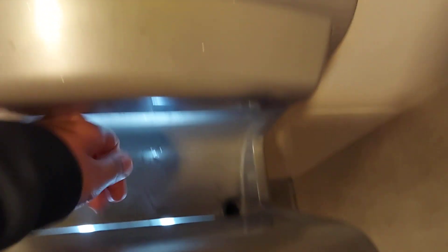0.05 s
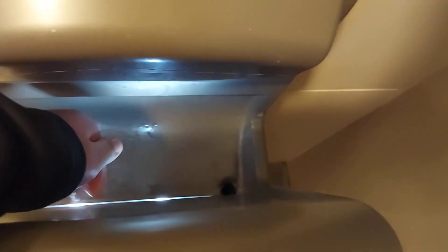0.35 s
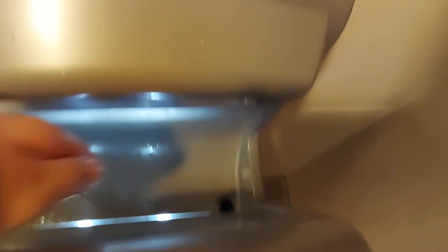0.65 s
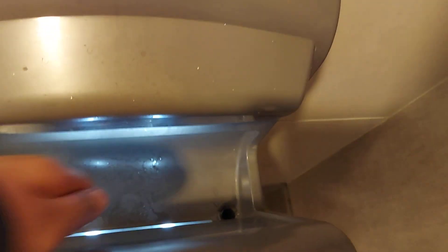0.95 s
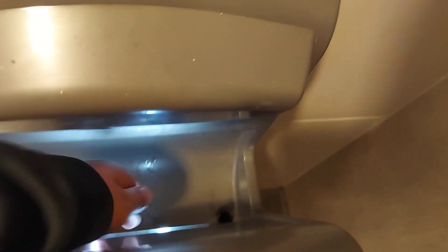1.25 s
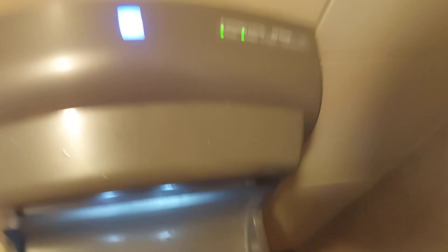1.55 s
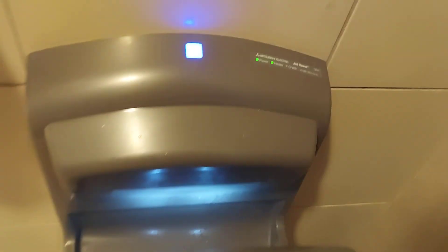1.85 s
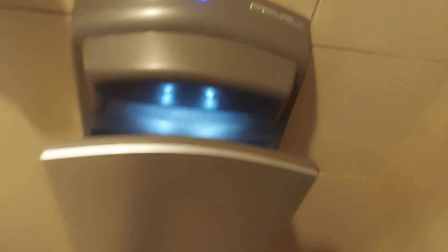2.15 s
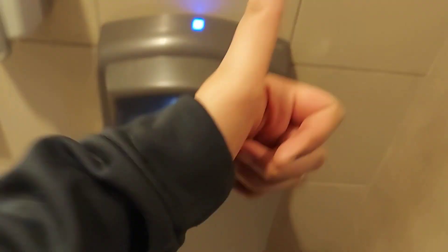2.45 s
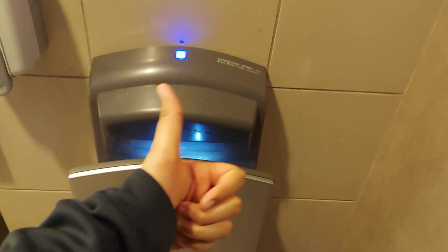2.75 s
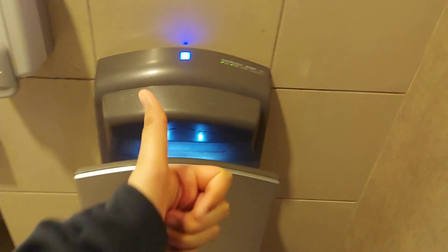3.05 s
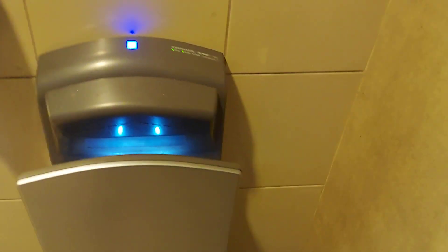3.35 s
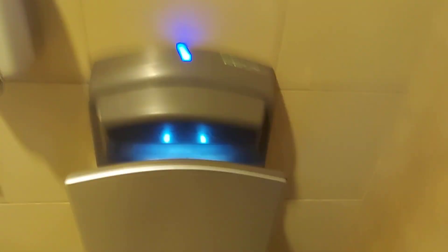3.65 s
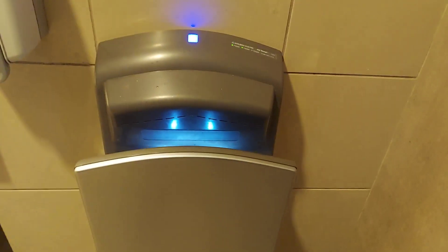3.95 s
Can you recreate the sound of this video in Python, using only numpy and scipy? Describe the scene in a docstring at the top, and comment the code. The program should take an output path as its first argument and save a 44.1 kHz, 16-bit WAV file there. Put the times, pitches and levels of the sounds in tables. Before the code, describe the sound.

A jet hand dryer blasts air over a hand, then starts winding down.

```python
"""A tiled restroom, the stereo microphone close to the trough of a running jet hand dryer. Air hisses
from the slits and booms in the trough, splashing and howling where a hand dips into the jets. The hand
leaves and the microphone backs away, so that the duct's drone and the fan's whine stand out.
Near the end the motor cuts out and the whine falls as the fan coasts down."""
import sys
import numpy as np
from scipy import signal
from scipy.fft import rfft, irfft, next_fast_len
from scipy.io import wavfile
from scipy.ndimage import map_coordinates

SR = 44100
rng = np.random.default_rng(int(sys.argv[2]) if len(sys.argv) > 2 else 0)


def int16_out(signal):
    """Quantize to a 16-bit WAV file."""
    q = np.round(np.clip(np.atleast_2d(signal).T, -1, 1) * 32767)
    wavfile.write(sys.argv[1], SR, q.astype(np.int16))


N = 176400


def amp(db):
    """Decibels to gain."""
    return 10 ** (np.asarray(db) / 20)


def unit(x):
    """Scale to rms 1."""
    return x / np.sqrt(np.mean(np.abs(x) ** 2) + 1e-20)


def along(points, hz):
    """Read (freq_hz, value) points on a log axis."""
    freqs, values = np.transpose(points)
    return np.interp(np.log(hz + 1), np.log(freqs + 1), values)


def clock():
    """The time of each sample."""
    return np.arange(N) / SR


def curve(rows):
    """(time_s, value) points joined by lines."""
    return np.interp(clock(), *np.transpose(rows))


def wobble(rate):
    """A smooth random curve, rate knots a second."""
    at = np.linspace(0, rate * N / SR, 4096)
    return np.interp(clock() * rate, at, map_coordinates(rng.standard_normal(2048), [at], mode="wrap"))


def scatter(rate):
    """The random strength and phase with which a tone reaches each channel through the room."""
    return unit(np.array([wobble(rate) + 1j * wobble(rate) for channel in range(2)]))


def peak(hz, pitch_hz, half_width_hz):
    """The gain of one resonance."""
    return 1 / np.hypot(1, (hz - pitch_hz) / half_width_hz)


def rush(gain, likeness, size=N):
    """Stereo noise of rms 1, coloured by gain(hz)."""
    hz = np.fft.rfftfreq(size, 1 / SR)
    angle = np.arccos(np.clip(along(likeness, hz), -1, 1)) / 2
    spectrum = rfft(rng.standard_normal((2, size))) * gain(hz)
    mid, side = irfft(spectrum * [np.cos(angle), np.sin(angle)], size)
    return unit(np.array([mid + side, mid - side]))


def swells(rows, likeness):
    """Bands of noise that each rise and fall once, within a second."""
    out, t = np.zeros((2, N + SR)), np.arange(SR) / SR - .5
    for peak_s, half_length_s, pitch_hz, half_width_hz, level_db in rows:
        band = rush(lambda hz: peak(hz, pitch_hz, half_width_hz), likeness, size=SR)
        start = max(round(peak_s * SR), 0)
        out[:, start:start + SR] += amp(level_db) * np.exp(-(t / half_length_s) ** 2 / 2) * band
    return out[:, SR // 2:][:, :N]


# Stereo image out in the room: freq_hz, left_right_likeness
ROOM_IMAGE = [(30, 0.89), (90, 1), (200, 0.96), (420, .92), (700, 0.37), (930, 0.52), (1130, 0.61),
              (1300, 0.48), (1520, 0.16), (1850, 0.28), (2100, 0.48), (2400, 0.46), (2850, 0.36),
              (4000, -0.44), (6000, -0.028), (15000, -0.0069)]
def flow(spectrum, level, gust_db, likeness=ROOM_IMAGE):
    """Coloured air noise on a relative level curve, with slow and quick turbulence."""
    gusts = gust_db * unit(wobble(8.94) + wobble(29.94))
    return amp(curve(level) + gusts) * rush(lambda hz: amp(along(spectrum, hz)), likeness)


def linger(x, t60_s=.35):
    """A sound rings on between the tiles."""
    tail = rush(np.ones_like, ROOM_IMAGE, size=SR) * amp(-60 * clock()[:SR] / t60_s)
    return signal.fftconvolve(x[None], unit(tail) / np.sqrt(SR), axes=1)[:, :N]


# Balance of the air noise at the microphone: freq_hz, left_over_right_db
BALANCE = [(70, 3.5), (140, -2), (300, 0), (700, 0.7), (1200, -1.2), (2200, -1.5), (4000, -1.3),
           (9000, -0.6)]
def tiles_and_eddies(x, treble_hz=1400):
    """Eddies stir the treble; reflections comb it, differently per channel, as the microphone moves."""
    hz, t, spectra = signal.stft(x, SR, nperseg=1024)

    def field(step_hz, rate):
        grid = np.meshgrid(hz / step_hz, t * rate, indexing="ij")
        return map_coordinates(rng.standard_normal((512, 256)), grid, mode="wrap")

    comb = 2.04 * np.array([field(step_hz=120.3, rate=1.29) for channel in range(2)])
    eddies = 1.34 * field(step_hz=1550, rate=45)
    ripple_db = (comb + eddies) * (hz / np.hypot(hz, treble_hz))[:, None]
    lean_db = along(BALANCE, hz) * np.array([[.5], [-.5]])
    return signal.istft(spectra * amp(ripple_db + lean_db[:, :, None]), SR, nperseg=1024)[1][:, :N]


# The duct, stronger from a step back
DUCT_SPECTRUM = [(150, -51), (220, -9), (250, -0.5), (270, 2.5), (295, -6), (312, -1.5), (328, -13.5),
                 (348, -0.5), (364, -8), (384, 2), (412, -12), (438, -8.5), (480, -20), (700, -28.5),
                 (1100, -61)]  # freq_hz, density_db
DUCT_LEVEL = [(0, -35), (.15, -27.5), (.48, -37), (.62, -30), (1.25, -29), (1.5, -31), (2.05, -29.5),
              (2.3, -26), (2.7, -25.5), (3.2, -24.5), (3.4, -24.5), (3.55, -28.5), (4, -30)]  # time_s, level_db
def duct_drone():
    """Air drones in the duct's low resonances."""
    return amp(-0.5) * flow(DUCT_SPECTRUM, DUCT_LEVEL, gust_db=1.0)


# The fan housing, heard near and far
HOUSING_SPECTRUM = [(400, -11), (620, -3.5), (800, -8), (960, -0.5), (1040, -2.5), (1140, 2), (1200, -5),
                    (1280, 6), (1420, -8), (1600, 4), (1750, -5), (1930, 4), (2200, -6), (2450, -7.5),
                    (2780, -3.5), (3100, -12), (4500, -33)]  # freq_hz, density_db
HOUSING_LEVEL = [(0, -30), (1.5, -33.5), (1.7, -36.5), (2.0, -31), (2.5, -34), (3.15, -30), (3.45, -32),
                 (3.75, -37), (4, -39.5)]  # time_s, level_db
def housing_air():
    """Air rushes through the fan housing, filling the midrange."""
    return flow(HOUSING_SPECTRUM, HOUSING_LEVEL, gust_db=1.0)


def motor_hum(rotor, speed, order=4):
    """The motor hums unsteadily at a multiple of the shaft rate and fades as it slows."""
    flutter = unit(1 + 1.06 * scatter(24.02)[0])
    return amp(-40 - 60 * (1 - speed)) * flutter * rotor ** order


# The casing, with the microphone in front of the dryer: time_s, level_db
CASING_LEVEL = [(1.75, -55), (1.9, -42), (2.35, -37), (2.55, -46), (2.9, -38), (3.2, -41), (3.4, -52),
                (3.55, -36), (3.7, -47), (3.85, -42.5), (4, -52)]
def casing_tone(speed, full_speed_hz=1140, sag_hz=90, width_hz=36):
    """A casing resonance whose pitch sags with the flow."""
    pitch_hz = full_speed_hz - sag_hz * (1 - speed)
    tone = np.exp(2j * np.pi * np.cumsum(pitch_hz) / SR)
    return amp(curve(CASING_LEVEL)) * scatter(2 * width_hz)[0] * tone


# The whine at the moving microphone: channels opposed beside the trough, alike from the front
WHINE_LEVEL = [(0, -42), (.18, -41), (.36, -30), (.55, -37), (.75, -36), (1.1, -44), (1.58, -42),
               (1.8, -29.5), (2.02, -32), (2.12, -41), (2.24, -34), (2.34, -44), (2.55, -41), (2.72, -32.5),
               (3.0, -49), (3.14, -37), (3.26, -44), (4, -75)]  # time_s, level_db
WHINE_PHASE = [(1.6, 2.7), (1.8, 1.5), (2.03, 1.9), (2.14, 0.2), (2.9, 0.2), (3.1, 2.2)]  # time_s, left_right_phase_rad
def blade_whine(rotor, shaft_hz, speed, blades=9, skirt_width_hz=45, skirt_below_hz=20):
    """The blade tone, wrapped in turbulent swish, sweeps through a housing resonance as it falls."""
    tone = rotor ** blades
    housing_gain = amp(-33) * peak(blades * shaft_hz, pitch_hz=1950, half_width_hz=95)
    ring = linger(np.real(tone * scatter(skirt_width_hz)[0]) * housing_gain)
    skirt = 0.8 * scatter(2 * skirt_width_hz)[0] * np.exp(-2j * np.pi * skirt_below_hz * clock())
    pan = amp([[-2.5], [2.5]])  # leans right
    phase = np.exp(1j * curve(WHINE_PHASE) * np.array([[.5], [-.5]]))
    whine = amp(curve(WHINE_LEVEL)) * unit(pan * phase * (1 + skirt))
    swish = amp(-43.5) * speed ** 2 * scatter(460)
    return ring + (whine + swish) * tone


def fan(running_hz=313.0, cut_s=3.17, half_speed_after_s=0.95):
    """Whine, casing tone and hum follow the shaft, which slows once the power is cut."""
    speed = 1 / (1 + np.maximum(clock() - cut_s, 0) / half_speed_after_s)
    shaft_hz = running_hz * speed * (1 + 0.00062 * wobble(8))
    rotor = np.exp(2j * np.pi * np.cumsum(shaft_hz) / SR)
    tones = blade_whine(rotor, shaft_hz, speed) + casing_tone(speed) + motor_hum(rotor, speed)
    return np.sqrt(2) * np.real(tones)


# Two narrow rings, strongest close in: time_s, level_db
EDGE_LEVEL = [(0, -40), (1.0, -36.5), (1.25, -42), (2.05, -45), (2.5, -49), (4, -72)]
CROSS_MODE_LEVEL = [(.5, -35), (.72, -28), (1.1, -33), (1.3, -39), (1.52, -27), (1.62, -34), (1.77, -27),
                    (1.95, -42), (3, -54)]
def whistles(edge_hz=5350, cross_hz=1900):
    """The jets ring the slit edges and a mode across the trough, opposed in the two channels."""
    edge = rush(lambda hz: peak(hz, edge_hz, half_width_hz=100), ROOM_IMAGE)
    cross_mode = rush(lambda hz: peak(hz, cross_hz, half_width_hz=200), likeness=[(cross_hz, -0.73)])
    return amp(curve(EDGE_LEVEL)) * edge + amp(curve(CROSS_MODE_LEVEL)) * cross_mode


# The trough's bass, fullest at close range
BOOM_SPECTRUM = [(20, -48), (40, -40), (68, -13.5), (88, -19), (110, -16), (126, -4.5), (143, 1.5),
                 (158, -11.5), (172, -1), (186, -15.5), (200, -6), (213, -23), (250, -17), (330, -52),
                 (600, -44)]  # freq_hz, density_db
BOOM_LEVEL = [(0, -21), (.2, -25.5), (.4, -28), (.62, -27), (.76, -20), (.88, -30), (1.0, -23.5),
              (1.15, -25.5), (1.35, -25.5), (1.55, -21), (1.75, -26), (1.95, -28), (2.3, -30),
              (3.15, -27.5), (3.5, -35)]  # time_s, level_db
def trough_boom():
    """The air stream booms in the hollow of the trough."""
    return amp(1.5) * flow(BOOM_SPECTRUM, BOOM_LEVEL, gust_db=-0.6)


# Low thumps from the trough: peak_s, half_length_s, pitch_hz, half_width_hz, level_db
BUFFETS = [(.91, .035, 112.4, 15, -24.5), (1.49, 0.048, 123, 14, -19.5), (3.37, 0.042, 116.4, 4.8, -33)]
def buffets():
    """Lumps of air buffet the trough."""
    return swells(BUFFETS, ROOM_IMAGE)


# The slits' broad hiss, and the sheen picked up in front of the dryer
HISS_SPECTRUM = [(1500, -27), (2600, -4.5), (3200, 1.5), (3700, 0), (4200, 1), (4600, 5.5), (4950, 1),
                 (5350, 3), (5800, 1), (6900, 1), (7600, 2), (8700, 2), (10200, -3.5), (11500, 0),
                 (13000, 0.5), (14200, -2.5), (16000, -4)]  # freq_hz, density_db
HISS_LEVEL = [(0, -33), (.38, -31.5), (.6, -32.5), (1.15, -33.5), (1.33, -33), (1.8, -33.5), (2.2, -36),
              (2.52, -39), (2.85, -38), (3.1, -36), (3.3, -38.5), (3.52, -41.5), (3.75, -47), (4, -52)]  # time_s, level_db
SHEEN_SPECTRUM = [(5500, -34), (7500, 1), (8600, -2), (9300, 1), (10300, -29)]  # freq_hz, density_db
SHEEN_LEVEL = [(0, -54), (2.5, -59), (3.1, -41), (3.5, -50), (4, -51)]  # time_s, level_db
def slit_hiss():
    """Air hisses from the slits, which beam their brightest sound to the front."""
    hiss = amp(5.5) * flow(HISS_SPECTRUM, HISS_LEVEL, gust_db=0.3)
    return hiss + flow(SHEEN_SPECTRUM, SHEEN_LEVEL, gust_db=1.5)


# The hand in the jets, with the microphone close to the trough
CLOSE_IMAGE = [(200, 0.56), (700, 0.84), (900, -0.6), (1200, 0.092), (1500, -0.16), (1700, 0.26),
               (2000, -0.36), (2400, 0.11), (2850, -0.97), (3600, 0.82), (4500, 0.43), (5400, 0.93),
               (7000, -0.088)]  # freq_hz, left_right_likeness
SPLASH_SPECTRUM = [(150, -12), (235, 16), (330, 6.5), (445, 13.5), (560, 7), (810, 3.5), (960, 3),
                   (1420, 5), (1680, 11), (2050, 6.5), (2400, 3.5), (2900, 4), (3400, -2.5), (5050, -4.5),
                   (7500, -10), (11000, -24), (16000, -11)]  # freq_hz, density_db
SPLASH_LEVEL = [(0, -27.5), (.4, -27), (.5, -27.5), (.78, -26.5), (1.15, -27), (1.5, -27), (1.64, -32),
                (2.0, -34.5), (2.4, -38.5), (3.2, -37.5), (4, -56)]  # time_s, level_db
HOWLS = [(.04, 0.14, 1850, 55, -27.5), (.37, 0.069, 4140, 1410, -26.5), (.38, 0.076, 1410, 300, -34),
         (0.567, .035, 4830, 700, -32.5), (.7, 0.1, 1760, 160, -25.5), (.88, 0.089, 2400, 280, -32.5),
         (.99, 0.068, 2060, 50, -30), (1.11, 0.076, 1865, 102, -23.5), (1.316, 0.078, 4790, 340, -30.5),
         (1.34, .05, 7200, 900, -33), (1.49, 0.06, 1690, 170, -25.5)]  # peak_s, half_length_s, pitch_hz, half_width_hz, level_db
def jets_on_hand():
    """The jets break on the hand and the trough wall; at each dip the gap howls or hisses."""
    splash = amp(3) * flow(SPLASH_SPECTRUM, SPLASH_LEVEL, gust_db=0.58, likeness=CLOSE_IMAGE)
    return splash + swells(HOWLS, CLOSE_IMAGE)


def scene():
    """Air, hand and fan in the tiled restroom."""
    air = slit_hiss() + trough_boom() + duct_drone() + housing_air() + buffets() + jets_on_hand()
    return tiles_and_eddies(air) + whistles() + fan()


def record(dry):
    """Nothing is kept above the band limit."""
    top_hz = 15750
    size = next_fast_len(N + SR // 2)
    passband = np.fft.rfftfreq(size, 1 / SR) < top_hz
    return irfft(rfft(dry, size) * passband, size)[:, :N]


dry = scene()
out = record(dry)
int16_out(out)
```